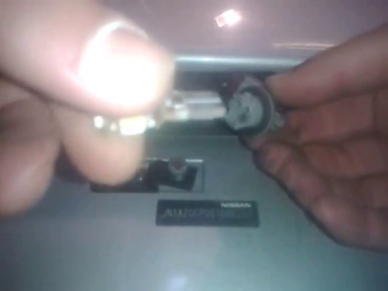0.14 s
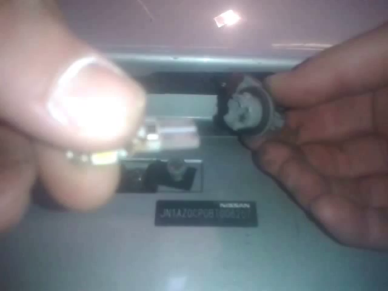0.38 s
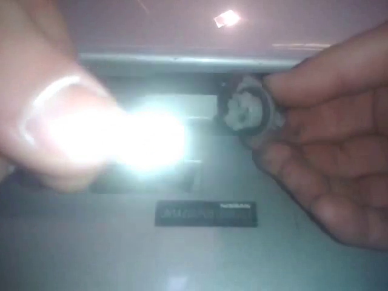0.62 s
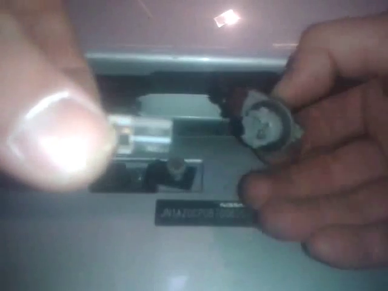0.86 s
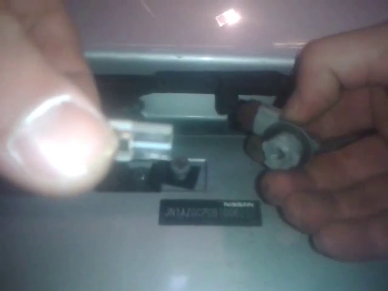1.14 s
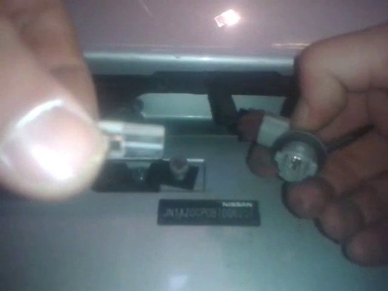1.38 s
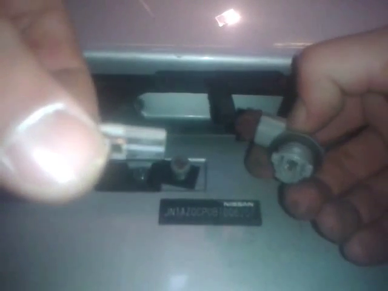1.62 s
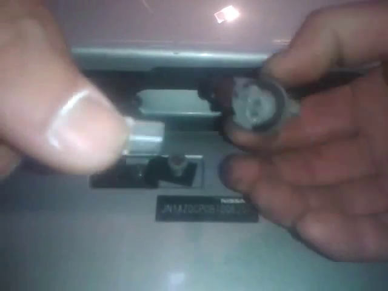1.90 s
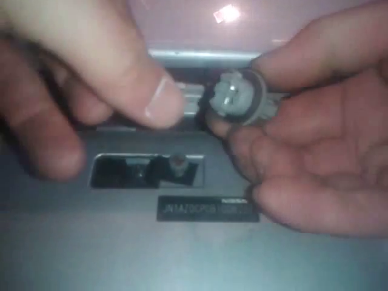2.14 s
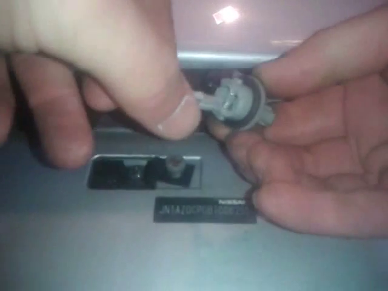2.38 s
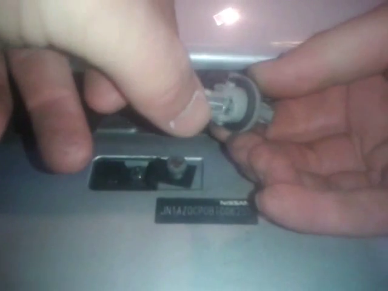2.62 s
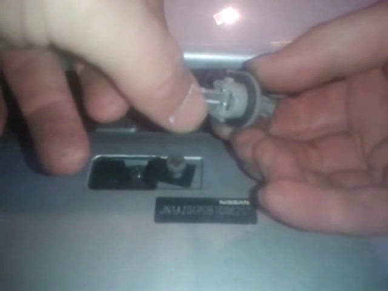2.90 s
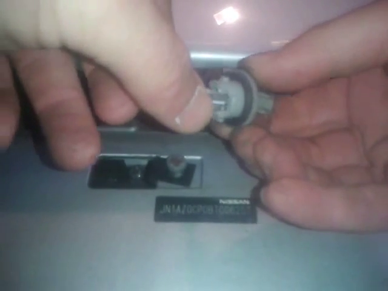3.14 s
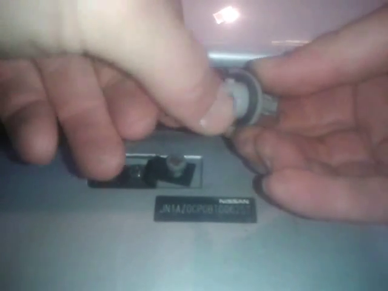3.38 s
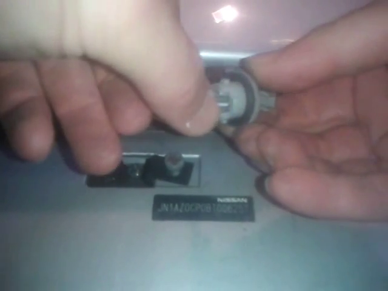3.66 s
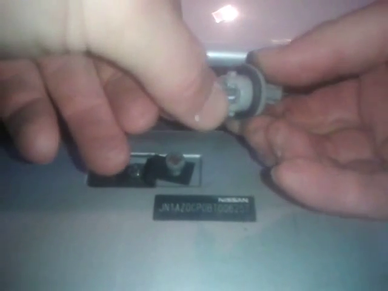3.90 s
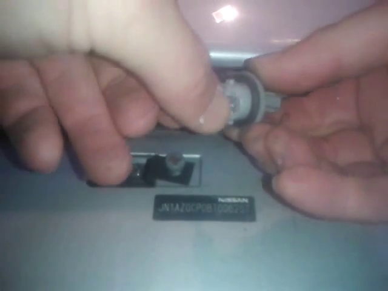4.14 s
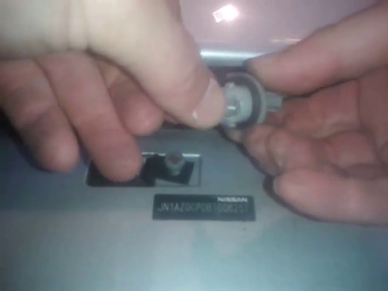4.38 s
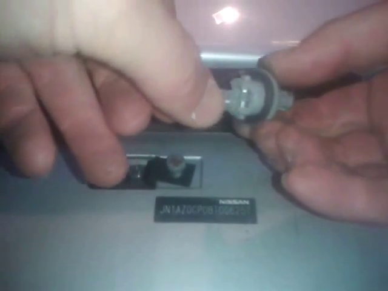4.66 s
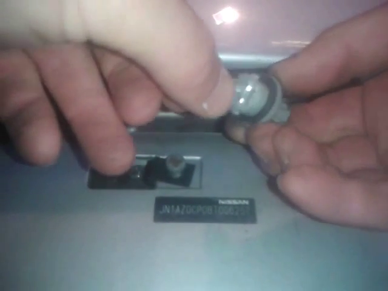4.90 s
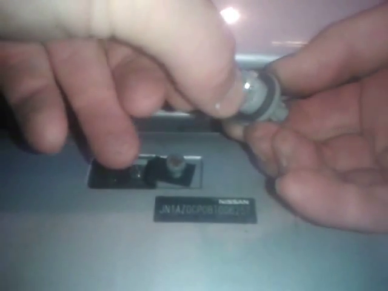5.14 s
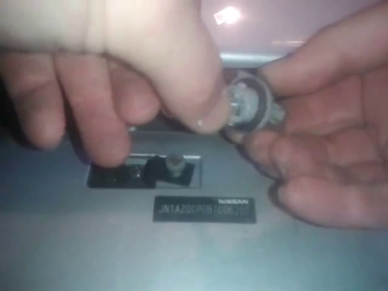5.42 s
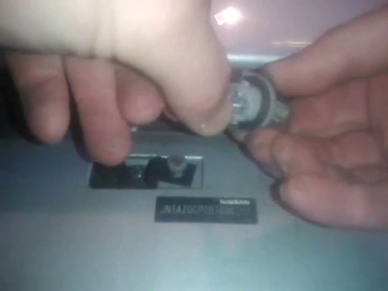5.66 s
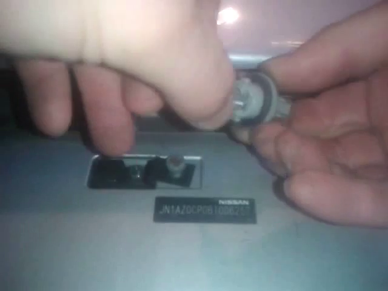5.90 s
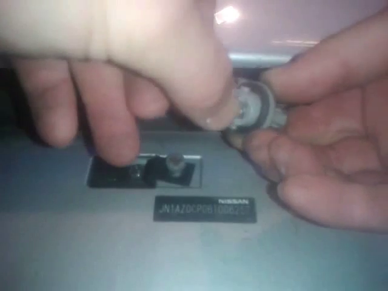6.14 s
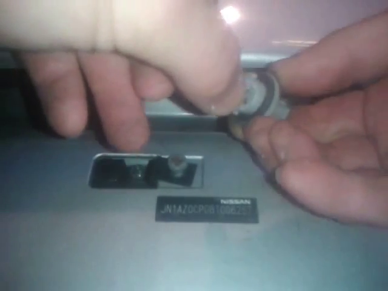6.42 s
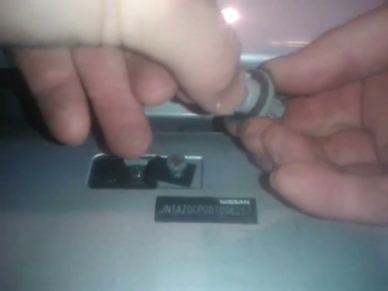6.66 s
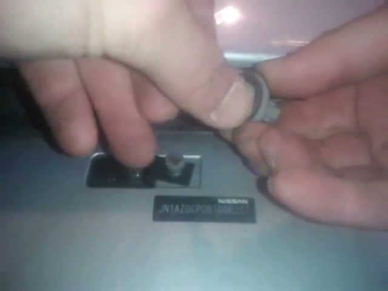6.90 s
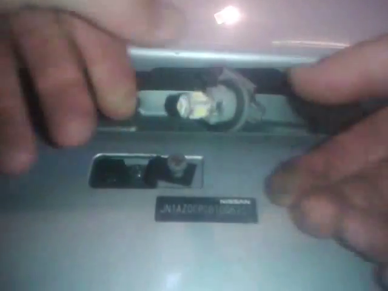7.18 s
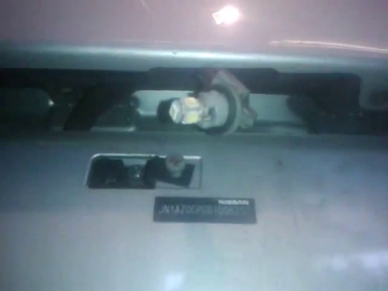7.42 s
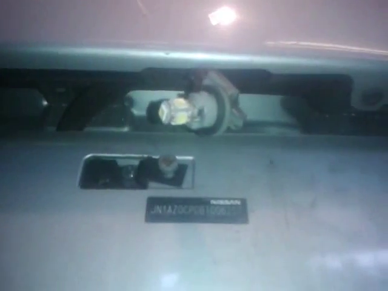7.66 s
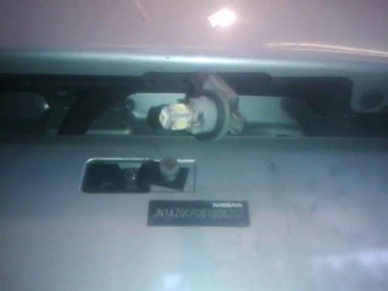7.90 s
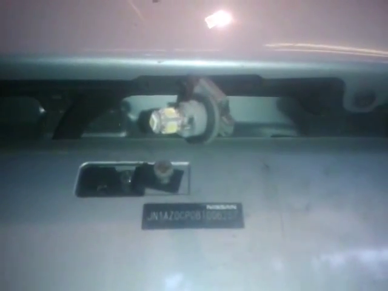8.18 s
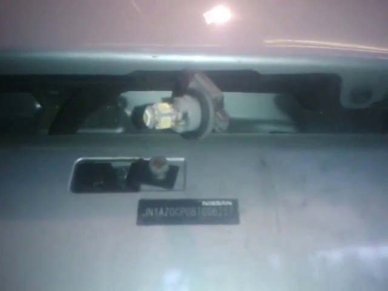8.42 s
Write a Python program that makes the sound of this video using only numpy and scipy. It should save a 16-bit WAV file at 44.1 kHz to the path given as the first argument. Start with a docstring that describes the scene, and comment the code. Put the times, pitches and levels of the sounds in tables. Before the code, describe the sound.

Sharp snaps, tiny rattles and brief metallic pings of a bulb being seated by hand, with rustling friction and a constant hiss beneath.

```python
"""Right beside a small camera, with no room echo, hands push a small bulb into a plastic socket.
Contacts snap and plastic ticks as sharp steps with tiny rattles; knocks and clips ring as fading sines.
Skin and sleeves rustle as filtered friction noise. At the end the hands let go and rub and knock
near the microphone. Jolts push the camera body; a low hum and a hiss, both noise, lie under all."""
import sys
import numpy as np
from scipy import signal
from scipy.fft import rfft, irfft, next_fast_len
from scipy.io import wavfile
from scipy.ndimage import map_coordinates

SR = 44100
rng = np.random.default_rng(int(sys.argv[2]) if len(sys.argv) > 2 else 0)


def natural_amplitude(level_db):
    """Convert a level in decibels to a linear amplitude factor, elementwise."""
    exponent = np.asarray(level_db, float) / 20
    return 10 ** exponent


def master_out(mix):
    """Clip the mix to full scale and print it as 16-bit PCM to the path in sys.argv[1]."""
    frames = np.transpose(np.atleast_2d(mix))
    ceiling = np.clip(frames, -1, 1)
    pcm = np.round(ceiling * 32767).astype(np.int16)
    wavfile.write(sys.argv[1], SR, pcm)


N = 377055  # length in samples

# How much smooth noise covers the grit: plastic parts grate, the last rubs are soft.
# Each row: time in seconds, smooth noise as a multiple of the grit.
SOFTNESS = [(0, 0.56), (.9, 0.78), (2.1, 0.92), (2.2, 0.75), (4.9, 0.73), (5.2, 0.83), (5.93, 0.94),
            (5.99, 2), (6.15, 1.54), (6.24, .8), (6.9, 0.94), (7.3, 1.6), (7.56, 1.5), (7.72, 1.8),
            (7.8, 1.2), (8.55, 1.6)]


def unit(x):
    """Scales a sound to an rms (average strength) of 1."""
    return x / np.sqrt(np.mean(x ** 2) + 1e-20)


def along(points, hz):
    """Reads a curve of (Hz, value) points on a logarithmic pitch axis."""
    f, v = np.transpose(points)
    return np.interp(np.log(hz + 1), np.log(f + 1), v)


def over_time(points):
    """Joins (seconds, value) points by straight lines, one value for each sample."""
    return np.interp(np.arange(N) / SR, *np.transpose(points))


def wobble(rate):
    """Draws a smooth random curve through `rate` random points a second."""
    knots = rng.standard_normal(int(N * rate / SR) + 4)
    return map_coordinates(knots, [np.arange(N) * rate / SR])


def filtered(x, response):
    """Multiplies the spectrum of x by a response that depends on frequency."""
    m = next_fast_len(N + SR // 2)
    spectrum = rfft(x, m) * response(np.fft.rfftfreq(m, 1 / SR))
    return irfft(spectrum, m)[..., :N]


def band(x, lo_hz, hi_hz, order=2):
    """Keeps the frequencies between two edges, using only the past of the sound."""
    edges = np.clip([lo_hz, hi_hz], 20, .45 * SR)
    return signal.sosfilt(signal.butter(order, edges, "band", fs=SR, output="sos"), x)


def ticks():
    """Each contact is one sharp step and a brief rattle; soft parts thump, metal clips add treble."""
    # Ticks and snaps. Each row: start in seconds, strength in dB before the band gains,
    # treble in dB relative to that strength, rattle length in ms.
    contacts = [(0.046, -24.5, -15, .26), (0.063, -24, -17, 0.09), (.0951, -23.5, -25, .08),
                (0.368, -42, -7, 0.34), (.416, -34, -14, 0.17), (0.428, -33, -20, .1), (.499, -37, -16, .4),
                (.617, -33, -16, 0.44), (0.714, -42, -12, .1), (1.0542, -17, -16, 0.23),
                (1.078, -19, -22, 0.54), (1.0873, -13, -14, 0.63), (1.1056, -27, -17, .1),
                (1.1651, -26, -17, 0.13), (1.204, -26, -18, 0.26), (1.2237, -22, -19, 0.063),
                (1.407, -29.5, -10, 1.1), (1.482, -26, -15, .3), (2.0117, -16, -16, .4),
                (2.0296, -22, -19, .9), (2.0337, -24, -20, 0.37), (2.0496, -25, -8, .06),
                (2.141, -21, -14, 0.43), (2.15, -21, -3, .2), (2.158, -4.5, -29, 0.31),
                (2.1658, -14, -7, 0.097), (2.175, -15, -26, 0.52), (2.1855, -19, -19, 0.97),
                (2.195, -27, -17, 0.81), (2.2833, -27, -8, 0.29), (2.2995, -15, -19, 0.58),
                (2.4292, -24.5, -18, 0.088), (2.4857, -25, -16, 0.18), (2.506, -26, -18, .1),
                (2.562, -21, -23, 0.23), (2.721, -20.5, -13, 0.054), (2.9362, -26, -20, 0.1),
                (3.013, -30.5, -18, 0.11), (3.1422, -25, -18, .1), (3.1951, -27, -3, .9),
                (3.207, -23, -17, 0.35), (3.224, -27, -20, 0.87), (3.3393, -25, -24, 0.55),
                (3.3736, -26, -13, .45), (3.4516, -26, -10, 0.59), (3.4698, -16, -9, 0.24),
                (3.4745, -7, -23, 0.54), (3.4759, -12, 9, 1.5), (3.484, -9, -12, .09),
                (3.518, -18, -6, 1.2), (3.5214, -9, -28, 0.17), (3.5346, -24, -15, 0.99),
                (3.5574, -21, -17, .1), (3.5773, -19, -9, .6), (3.629, -15, -5.5, 0.085),
                (3.678, -22, -20, 0.22), (3.6857, -21, -22, .37), (3.695, -16, -21, .45),
                (3.705, -12, -19, 0.096), (3.775, -15, -19, 0.083), (3.7903, -27, -19, .4),
                (3.8085, -17, -21, .11), (3.8163, -26.5, -19, 1.2), (3.9835, -14.5, -13, 0.13),
                (4.016, -25.5, -3.5, 0.18), (4.076, -22, -25, 0.16), (4.0955, -19.5, -11, 0.45),
                (4.1519, -22, -14, .12), (4.2152, -24.5, 2.5, 2.45), (4.2755, -32, -10, 1.1),
                (4.3038, -26, -15, .2), (4.322, -15.5, -6, 0.21), (4.324, -20, -41, 0.81),
                (4.3447, -27, -10, 0.073), (4.377, -28, -16, .5), (4.4674, -14.5, -4, 0.099),
                (4.4793, -24, -5, .16), (4.509, -31, -20, .4), (4.5365, -29, -16, .33),
                (4.557, -20, -10, .12), (4.5723, -30, -17, 0.37), (4.6062, -15.5, -10, 0.031),
                (4.7273, -28, -18, 0.72), (4.833, -40, -14, 0.091), (4.874, -24.5, -11, 0.26),
                (4.9609, -19, -17, 0.31), (5.12, -30, -18, 0.11), (5.128, -24.5, -19, 0.34),
                (5.153, -29, -22, 0.17), (5.522, -36.5, -25, 0.25), (5.603, -23.5, -3, 1.1),
                (5.8426, -28, -6, .09), (5.8935, -11.5, -17, 0.065), (5.913, -20, -18, 0.44),
                (5.97, -23, -3.5, 1.7), (6.2474, -30, -17, .44), (6.2713, -22, -19, 0.22),
                (6.2766, -14.5, -24, 0.056), (6.3025, -23.5, -21, 0.46), (6.3154, -20.5, -30, .1),
                (6.49, -19, -13, 0.21), (6.733, -33, -18, .1), (6.743, -31, -18, .1), (6.847, -21, -3, 2.6),
                (7.117, -44, -16, .2), (7.483, -49, -16, 0.041), (8.0578, -15, -10, 0.56),
                (8.0629, -19, -14, 0.29), (8.072, -9.5, -20, 0.04), (8.0802, -21, -21, .65),
                (8.104, -16, -24, 0.086), (8.2131, -22, -22, .37), (8.22, -18, -21, .13),
                (8.241, -17, -21, 0.46), (8.259, -3, -12.5, 0.087), (8.281, -16, -15, .2),
                (8.3002, -12.5, -11, 1.9), (8.3399, -17.5, -20, 1.7), (8.3945, -20, -19, 0.97)]
    # Relative to the snap, before the band gains; long contacts are softer and thump more.
    thump_base_db, thump_scatter_db, thump_db_per_ms = -20, 2.1, 3
    ms = np.arange(SR // 60) / SR * 1000
    draws = rng.standard_normal((len(contacts), len(ms)))
    force = np.zeros((3, N + len(ms)))  # rows: snap, thump, treble
    for (s, db, treble_db, length_ms), draw in zip(contacts, draws):
        rattle = 0.22 * draw * np.exp(-(ms / max(length_ms, .05)) ** 2.1)
        rattle[0] = -1  # the sharp step
        thump_db = thump_base_db + thump_db_per_ms * length_ms + thump_scatter_db * draw[0]
        levels = natural_amplitude(db + np.array([[0], [thump_db], [treble_db]]))
        force[:, round(s * SR):][:, :len(ms)] += levels * rattle
    snap, thump, treble = force[:, :N]
    body = natural_amplitude(31.0) * band(thump, 267, 2780)
    bass = natural_amplitude(16) * band(thump, 25, 250, order=1)
    return natural_amplitude(15.5) * band(snap, 1440, 4380) + body + bass + natural_amplitude(23.0) * band(treble, 5700, 12400)


def knocks():
    """A blow rings a hollow shell or a metal clip for a few cycles; higher notes die sooner."""
    # Hollow knocks and pings of the metal clips.
    # Each row: start in seconds, strength in dB before the fade-in and gain, pitch in Hz.
    blows = [(2.157, -48, 385), (2.299, -50, 690), (3.474, -25.5, 606), (3.4753, -5.5, 4600),
             (3.644, -26, 3920), (4.215, -18.5, 4530), (4.324, -19, 4260), (6.603, -41.5, 510),
             (6.694, -33, 4370), (6.825, -32.5, 580), (6.847, -15, 4500), (6.847, -33, 537),
             (6.985, -54, 554), (7.112, -38, 465), (7.134, -39, 670), (7.159, -31.5, 564),
             (7.266, -37, 497), (7.408, -44.5, 540), (8.145, -29.5, 310), (8.144, -29, 856),
             (8.292, -22.5, 616), (8.294, -22, 438), (8.312, -26.5, 203), (8.428, -29, 286)]
    longest_t60_s, damped_above_hz = 0.035, 1200  # t60 is the time to fade by 60 dB
    t, out = np.arange(SR // 8) / SR, np.zeros(N + SR)
    for s, db, hz in blows:
        t60 = longest_t60_s / (1 + hz / damped_above_hz)
        envelope = natural_amplitude(db - 60 * t / t60) * (1 - np.exp(-t * hz / 0.96))
        ring = envelope * np.sin(2 * np.pi * hz * t)
        out[round(s * SR):][:len(t)] += ring / abs(port(hz))  # evens out the port's later gain
    return natural_amplitude(7.0) * out[:N]


def slips(rate, spread_db):
    """Stick-slip friction: clumps of tiny impulses of uneven size over a smooth noise."""
    size = natural_amplitude(spread_db * np.minimum(rng.exponential(size=N), 4)) * rng.standard_normal(N)
    chance = rate / SR * natural_amplitude(5 * wobble(60))  # its wobble makes the clumps
    grains = size * (rng.random(N) < chance)
    soft = over_time(SOFTNESS)
    return (unit(grains) + soft * rng.standard_normal(N)) / np.sqrt(1 + soft ** 2)


def rubbing():
    """Each stroke's power climbs and falls; its dull part sits in the hollow of the hands."""
    # Single strokes of skin and cloth. Each row: strongest moment in seconds, rise in ms, fall in ms,
    # rustle in dB before the noise gains, dull part in dB relative to that rustle.
    strokes = [(.14, 100, 7.5, -45.5, -9.5), (.234, 43, 11, -60.5, 2.5), (.424, 22, 18, -49, -11),
               (0.62, 5.4, 36, -56, -11), (.751, 21, 61, -43.5, -13), (.878, 30, 290, -52, -10),
               (1.058, 68, 59, -38, -9.5), (1.232, 108, 39, -45, -4.5), (1.407, 26, 7.9, -52.5, 2.5),
               (1.483, 6.4, 18, -41.5, -12), (1.69, 40, 10, -56, -6), (1.77, 25, 32, -48.5, -11),
               (2.002, 46, 60, -40, -9), (2.19, 68, 15.5, -35, -15), (2.36, 38, 47, -42, -5.5),
               (2.494, 110, 18, -50.5, -8), (2.594, 90, 12, -47.5, -11.5), (2.749, 16, 65, -55, -4),
               (2.938, 30, 46, -53.5, -5.5), (3.158, 52, 24, -48.5, -4), (3.196, 5.5, 25, -42.5, -6),
               (3.34, 77, 25, -44, -6.5), (3.482, 43, 66, -34.5, -10), (3.478, 6, 7, -28, -0.5),
               (3.517, 5, 18, -33.5, -18), (3.697, 21, 25, -38.5, -11), (3.781, 17, 56, -37, -14),
               (4.091, 39, 19, -45, -29), (4.156, 17, 17, -48.5, -7.5), (4.215, 38, 28, -42.5, -27),
               (4.275, 14, 8.7, -43.5, -30), (4.325, 31, 9, -35.5, -17), (4.47, 15, 20, -47, -9),
               (4.555, 28, 57, -39, -22), (4.74, 45, 48, -43, -1.5), (4.964, 160, 31, -49, -8),
               (5.133, 49, 45, -48.5, -5), (5.24, 90, 46, -60, 2.5), (5.352, 65, 26, -49, -0.5),
               (5.42, 65, 27, -62, 1), (5.597, 21, 38, -44.5, -3.5), (5.712, 16, 57, -48.5, -0.5),
               (5.84, 56, 47, -51.5, 2.5), (5.92, 57, 36, -44, -0.5), (5.99, 81, 153, -44, -10.5),
               (6.27, 38, 40, -40, -2.5), (6.2, 52, 27, -55.5, 4.5), (6.39, 35, 21, -47, -5.5),
               (6.5, 7.1, 24, -48, -16), (6.545, 31, 9.8, -51, -3.5), (6.605, 14, 11, -48, -4),
               (6.685, 37, 28, -46, -6.5), (6.834, 78, 76, -44, -2.5), (6.854, 42, 5.5, -36.5, -12),
               (6.985, 17, 45, -55, 2.5), (7.065, 20, 20, -53.5, -2.5), (7.115, 14, 74, -49, 1.5),
               (7.165, 14, 49, -45.5, 2), (7.224, 36, 124, -37, -8), (7.27, 110, 450, -51, -6.5),
               (7.433, 9.1, 60, -73, -3), (7.547, 16, 210, -44, -4.5), (7.62, 76, 60, -46, 3),
               (7.69, 60, 60, -49.5, 4), (7.77, 68, 42, -40, -5), (7.858, 73, 19, -39, -6.5),
               (7.926, 6, 15.7, -34.5, -9), (7.983, 3.5, 19, -30, -16), (8.01, 33, 34, -32.5, -9.5),
               (8.098, 127, 8.1, -41, -9), (8.149, 3.2, 100, -44.5, 0.5), (8.19, 38, 29, -37, -3.5),
               (8.255, 46, 32, -31.5, -7.5), (8.3, 30, 20.4, -29, -9), (8.34, 14.5, 59, -33, -6),
               (8.375, 53, 7.9, -27.5, -8.5), (8.4, 22, 50, -37, 0.5), (8.505, 52, 60, -35, 0)]
    # Steady rustle of fingers that never quite rest.
    # Each row: time in seconds, level in dB before the noise gains.
    fidget = [(0, -52.5), (.55, -70.5), (1.07, -57), (1.45, -50.5), (1.85, -60), (2.2, -52), (2.65, -59.5),
              (3.05, -59.5), (3.25, -49.5), (3.75, -47), (4.3, -54.5), (4.65, -57.5), (4.85, -51.5),
              (5.03, -64), (5.3, -55), (5.46, -67.5), (5.9, -51.5), (6.3, -52.5), (6.58, -60.5), (6.9, -57),
              (7.35, -57), (7.51, -80), (7.9, -57.5), (8.12, -49.5), (8.55, -45.5)]
    # The hollow that the hands form around the socket. Each row: time in seconds, pitch in Hz.
    hollow = [(0, 1340), (.5, 800), (.8, 1240), (2.5, 1250), (3.3, 970), (3.7, 1200), (6.6, 1350),
              (6.85, 765), (7.16, 685), (7.26, 1220), (7.55, 1217), (7.6, 980), (7.7, 1180), (7.82, 1500),
              (8.05, 1280), (8.15, 780), (8.55, 945)]
    # Resonance bands of the dull rub. Each entry: centre in Hz.
    centres = [485, 714, 1047, 1500]
    fidget_dull_db = -9.5  # relative to the steady rustle
    airy_from, airy_full = .9, 2.4  # softness where the rustle starts to lose, and has lost, its low part

    t = np.arange(N) / SR
    bright_power = natural_amplitude(over_time(fidget)) ** 2
    dull_power = natural_amplitude(fidget_dull_db) ** 2 * bright_power
    for top, rise_ms, fall_ms, db, dull_db in strokes:
        span = top + np.array([-rise_ms, 0, fall_ms]) / 1000
        at = slice(max(round(span[0] * SR), 0), round(span[-1] * SR))
        power = natural_amplitude(db) ** 2 * np.interp(t[at], span, [0, 1, 0])
        bright_power[at] += power
        dull_power[at] += natural_amplitude(dull_db) ** 2 * power

    # bands nearest the hollow's pitch get most of the dull power
    distance = np.log(np.array(centres)[:, None] / over_time(hollow))
    share = np.exp(-(distance / 0.5) ** 2)
    band_powers = dull_power * share / share.sum(0)

    grit = slips(rate=1500, spread_db=5.0)
    skin = slips(rate=900, spread_db=3.0)
    airy = np.clip((over_time(SOFTNESS) - airy_from) / (airy_full - airy_from), 0, 1)
    full_swish = unit(band(grit, 1550, 7220))
    airy_swish = natural_amplitude(-2) * unit(band(grit, 3320, 7400))
    swish = (1 - airy) * full_swish + airy * airy_swish
    fizz = unit(band(grit, 5800, 11300))
    rustle = natural_amplitude(5.5 + 1.25 * wobble(45)) * swish + natural_amplitude(2 + 1.5 * wobble(15)) * fizz
    rub = np.zeros(N)
    for power, hz in zip(band_powers, centres):
        rub += np.sqrt(power) * unit(band(skin, hz / 1.325, hz * 1.34))
    return np.sqrt(bright_power) * rustle + natural_amplitude(10 + 1.9 * wobble(30)) * rub


def jolts():
    """A push and its slow rebound reach the microphone through the housing."""
    # Small jolts of the camera body. Each row: start in seconds, strength in dB before shape and gain.
    pushes = [(2.157, -44), (2.3, -59), (3.474, -46), (3.644, -54), (3.702, -55), (3.774, -55),
              (3.983, -63), (4.323, -45), (5.895, -58), (7.839, -56), (7.989, -53), (8.259, -56),
              (8.311, -48)]
    time_scale_ms = 1.27
    u, out = np.arange(SR // 15) / SR * 1000 / time_scale_ms, np.zeros(N + SR)
    for s, db in pushes:
        out[round(s * SR):][:len(u)] += natural_amplitude(db + 10) * u * (1 - u / 2) * np.exp(1 - u)
    return out[:N]


def background():
    """Steady hiss with two faint narrow bands, and a low hum that swells; all are shaped noise."""
    # Colour of the hiss. Each row: frequency in Hz, relative level in dB.
    hiss_colour = [(15, -41), (25, 2.5), (80, -6), (190, 2.5), (390, 2.5), (560, 0.5), (800, -0.5),
                   (1700, -5.5), (3800, -17), (4800, -18.5), (5400, -4), (6000, -22), (6700, -10.5),
                   (15100, -6), (16400, -24)]
    # Faint narrow bands in the hiss. Each row: centre in Hz, width in Hz, middle level in dB.
    whistles = [(5100, 150, -68), (9040, 350, -77.5)]
    # Slow swell of the low hum; it jumps when a hand presses on the camera.
    # Each row: time in seconds, level in dB before the band levels.
    hum_swell = [(0, -61.5), (1.29, -65), (1.9, -60.5), (2.66, -60), (4.6, -63.5), (6.12, -64),
                 (6.59, -63.5), (7.28, -60.5), (7.69, -70), (8.12, -58), (8.21, -51.5), (8.31, -45.5),
                 (8.36, -49.5), (8.55, -53)]
    # The hum gathers in bands that each come and go.
    # Each row: low edge in Hz, high edge in Hz, middle level in dB relative to the swell.
    hum_bands = [(122, 294, -4.5), (266, 350, -10.5), (352, 490, -6)]
    hiss_db = -61.5  # middle level

    hiss = unit(filtered(rng.standard_normal(N), lambda hz: natural_amplitude(along(hiss_colour, hz))))
    narrow = np.zeros(N)
    for hz, width, db in whistles:
        tone = unit(band(rng.standard_normal(N), hz - width / 2, hz + width / 2, order=1))
        narrow += natural_amplitude(db + 0.73 * wobble(2.06)) * tone
    hum = np.zeros(N)
    for lo_hz, hi_hz, db in hum_bands:
        hum += natural_amplitude(db + 4.1 * wobble(6)) * unit(band(rng.standard_normal(N), lo_hz, hi_hz))
    return natural_amplitude(hiss_db + 1.0 * wobble(7.1)) * hiss + narrow + natural_amplitude(over_time(hum_swell)) * hum


def port(hz):
    """The microphone hole's resonances lift the presence range and fall steeply above it."""
    # Port resonances. Each row: centre in Hz, width in Hz, level in dB of that resonance alone.
    resonances = [(5004, 1700, 0.5), (9230, 430, -11.5), (16100, 7300, -14)]
    total = 0
    for k, (centre, width, db) in enumerate(resonances):
        resonance = centre * width / (centre * centre - hz * hz + 1j * hz * width)
        total = total + (-1) ** k * natural_amplitude(db) * resonance  # signs alternate
    return total


def scene():
    """Adds the sounds of the hands close to the camera, in the open."""
    return (rubbing() + ticks() + knocks())[None]


def low_pass(x):
    """Removes everything above the highest recorded frequency."""
    return signal.sosfilt(signal.butter(12, 16500, fs=SR, output="sos"), x)


def record(dry):
    """The port colours the hands' sounds; jolts and background join them unfiltered by it."""
    mix = filtered(dry, port) + jolts() + background()
    return low_pass(mix)


dry = scene()
out = record(dry)
master_out(out)
```